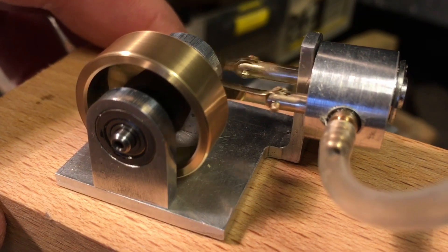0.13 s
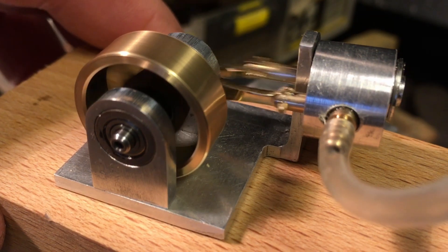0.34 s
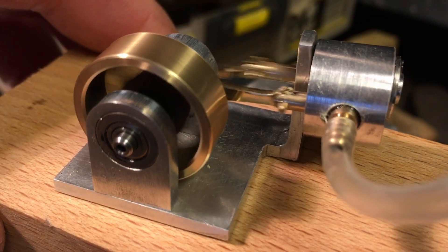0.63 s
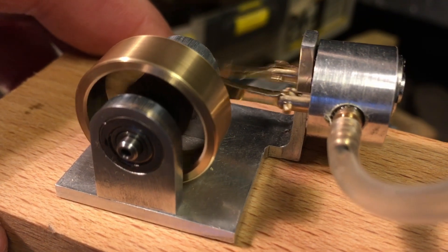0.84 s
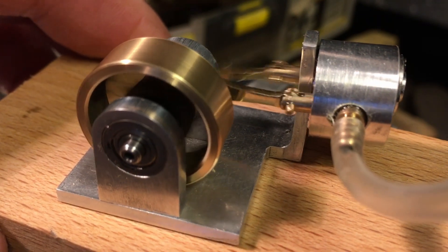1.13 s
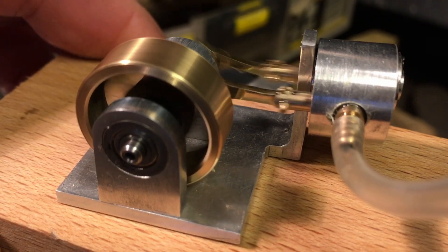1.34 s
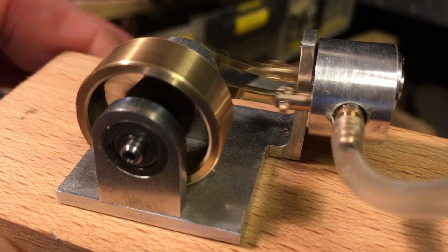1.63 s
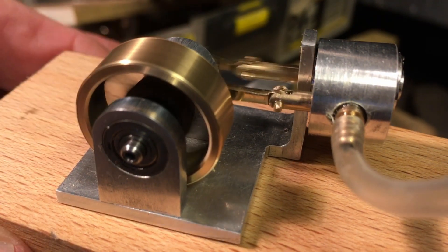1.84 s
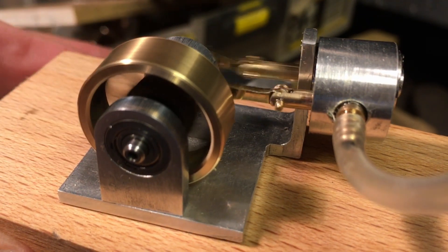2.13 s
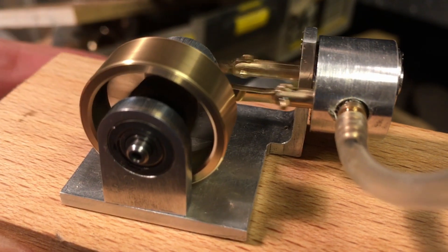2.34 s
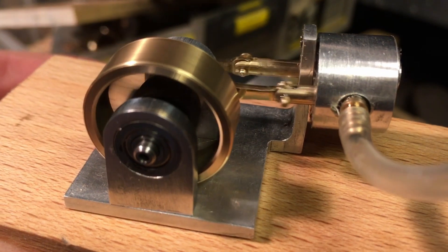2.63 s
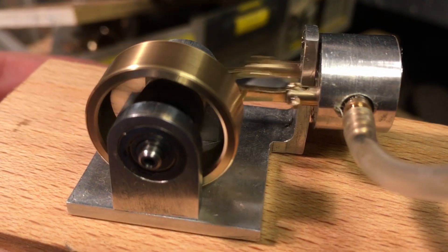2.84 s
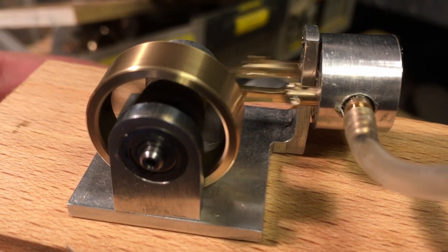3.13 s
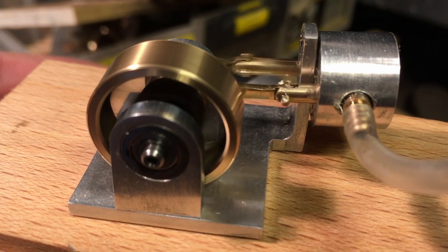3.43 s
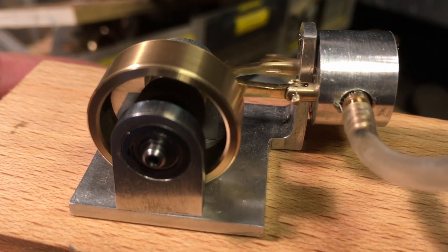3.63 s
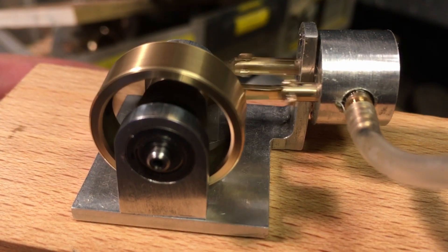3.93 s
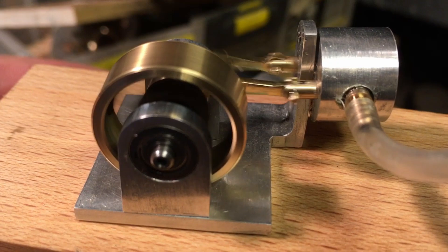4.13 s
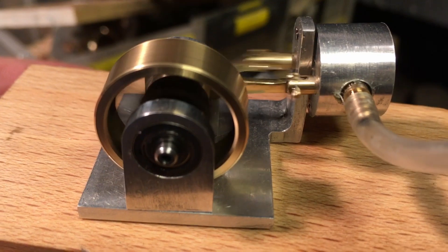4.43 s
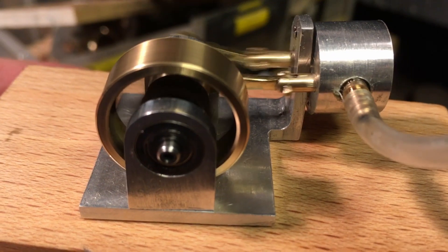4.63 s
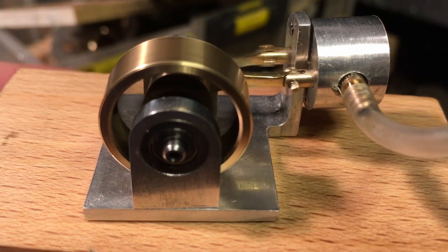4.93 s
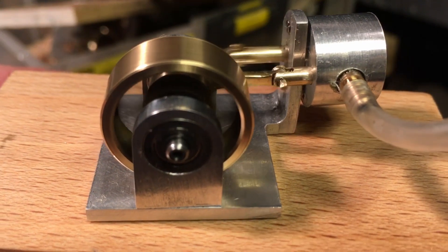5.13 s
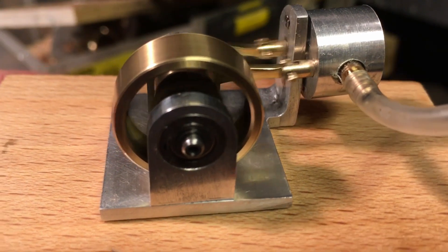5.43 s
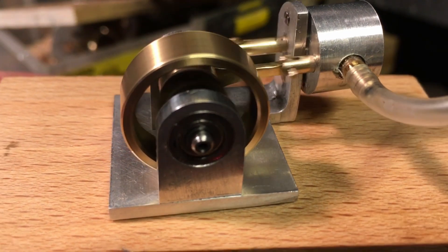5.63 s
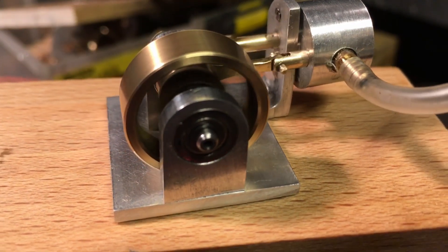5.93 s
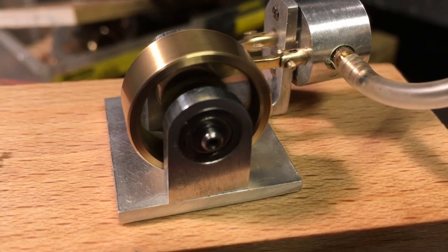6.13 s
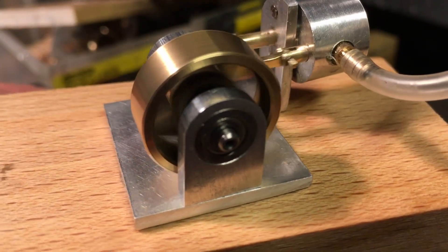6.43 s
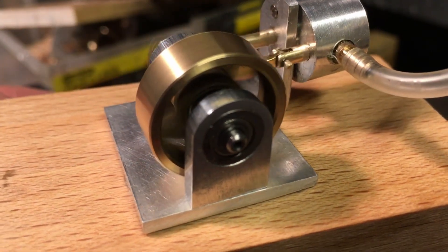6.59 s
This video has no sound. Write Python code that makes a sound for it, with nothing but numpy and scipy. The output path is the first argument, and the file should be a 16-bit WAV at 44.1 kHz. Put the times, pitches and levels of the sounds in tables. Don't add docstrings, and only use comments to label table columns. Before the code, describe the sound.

A miniature air-powered engine on a wooden board runs without pause, about seven and a half turns a second. Each turn gives a sharp metallic tick, lighter clicks and two short hissing puffs, about fifteen puffs a second, with faint airy whistles. Near the end it slows slightly and the ticking brightens. A very faint low hum lies beneath. Close microphone, dry small workshop, slightly stronger on the right.

```python
import sys
import numpy as np
from scipy import signal
from scipy.fft import rfft, irfft
from scipy.io import wavfile

SR = 44100
rng = np.random.default_rng(int(sys.argv[2]) if len(sys.argv) > 2 else 0)


def int16_out(signal):
    q = np.round(np.clip(np.atleast_2d(signal).T, -1, 1) * 32767)
    wavfile.write(sys.argv[1], SR, q.astype(np.int16))


def makeup_ratio(level_db):
    decades = np.asarray(level_db, float) / 20
    return 10 ** decades


N = 298116

# time in seconds, turns done; a turn begins with the rod knock.
CRANK = [(-.0132, 0), (.253, 2), (.5209, 4), (.7854, 6), (1.3109, 10), (1.5765, 12), (1.9744, 15),
         (2.3686, 18), (2.5007, 19), (2.8938, 22), (3.8104, 29), (4.5944, 35), (4.9838, 38), (5.5061, 42),
         (5.6389, 43), (5.7744, 44), (6.3186, 48), (6.857, 52)]

# place in the turn (0-1), flow in dB, sharpness of the jet in dB.
PORTS = [(.03, 3, .3), (.12, -2.5, 2.2), (.165, .8, 1.3), (.195, 5, -5.5), (.215, -2.5, -4),
         (.24, -10, 2.5), (.32, -25, 2.7), (.405, -31, 2.5), (.425, -11.1, .3), (.445, -2.5, -1.3),
         (.48, .4, .1), (.63, -.3, 0), (.695, -6.6, -2.1), (.725, -20, 5.5), (.865, -32, -1), (.9, -11, -6),
         (.945, .7, -5), (.975, 4.8, -5.2)]
# level at full flow in dB, share of the flow swing, share of the sharpness.
AIR_LAYERS = [
    (-60, 0.62, -1),
    (-55, 1.02, -0.15),
    (-53, 0.78, -0.068),
    (-48, 1.3, 0.62),
]
# frequency in Hz, density in dB per Hz.
GUSH_COLOUR = [(1300, -20.5), (2100, -9.5), (2900, -3), (3500, 0.5), (4100, -2), (4700, -3.5)]
RUSH_COLOUR = [(3800, -21.5), (4400, -4), (4950, -3), (5500, 1.5), (6300, 0.5), (7000, -1), (7700, -7),
               (8300, -28)]
JET_COLOUR = [(7300, -15), (8000, -6.5), (8700, -1), (9800, -5), (10500, -3.5), (11300, -11.5),
              (12000, 1.5), (12800, -24)]
LEAK_COLOUR = [(11200, -30), (12000, -11), (13000, -2), (14500, 0), (15700, 1), (16000, -29), (16500, -40)]
SPILL_COLOUR = [(350, 0), (700, -22.5), (1100, 3.5), (1600, 3.5), (2300, 4)]
SPILL_DB, SPILL_LAG_TURN = -14.5, 0.045
# time in seconds, level in dB.
SUPPLY = [(0, 0.5), (1.7, 1), (2.6, -0.1), (5.4, -0.5), (5.9, -1), (6.6, -0.7), (6.76, -1.5)]
DULL_CEILING_DB, DULL_FOLLOWS, WHISTLE_FOLLOWS = -0.17, 2.7, 1.9
# time in seconds, dB the second puff's bright air gains and the first loses.
SWING = [(5.3, 0.063), (6.3, 1.5)]
JET_FACING_DB = 1.55
# time in seconds, level in dB.
LEAK_FACING = [(0.5, 0), (3.5, 0.7), (6.6, -0.7)]
# place in the turn (0-1), pitch in Hz, level in dB.
WHISTLES = [
    [(.01, 1300, -85), (.07, 2500, -69), (.12, 2950, -67), (.17, 2750, -70), (.2, 2300, -85)],
    [(.45, 2200, -80), (.5, 3200, -67), (.53, 3700, -63), (.58, 4200, -66), (.63, 4200, -67),
     (.66, 3900, -85)],
    [(.49, 2400, -85), (.56, 2750, -73), (.605, 2880, -61.5), (.64, 2680, -60), (.675, 2200, -70),
     (.7, 1900, -85)],
]
LOW_WHISTLE_DB, LOW_WHISTLE_SCATTER_DB, CHOKED_DB, HIGH_WHISTLE_SCATTER_DB = 4.5, 1.6, -11, 1.5
CHOKED_TURNS = [0, 1, 7, 9, 12, 18, 22, 25, 28, 32, 33, 34, 35, 39, 41, 44, 46, 47, 49, 50]

# frequency in Hz, density in dB per Hz.
ROOM_COLOUR = [(20, -6), (40, 3.5), (64, 10.5), (100, 5.5), (200, 1.5), (500, -4.5), (1190, -2),
               (1790, -6.5), (2760, 0), (4870, -17.5), (7510, -11.5), (8360, -6.5), (14800, -12),
               (16000, -22)]
ROOM_DB, MOTOR_HZ, MOTOR_DB = -68.5, 54, -71.5
# time in seconds, pitch in Hz, level in dB, length in seconds.
FAR_HUMS = [(0.44, 155, -74, .12), (0.523, 196.7, -74.5, 0.17), (1.36, 750, -72, 0.095),
            (1.447, 196, -77, 0.18), (2.544, 136, -71, 0.13), (4.228, 220, -75, 0.15),
            (5.054, 196.4, -73, 0.18), (5.37, 197, -69, 0.14), (5.6, 187, -73, 0.15),
            (6.084, 198, -71, 0.1)]

# pitch in Hz, t60 in seconds, then level in dB under rod, valve and return knocks.
LINKS = [(8340, 0.006, -15, -7, -10.5), (9620, 0.003, -2, -1.5, -4.5), (11090, 0.0017, 0.5, 1, -0.5),
         (12420, 0.0041, -8, -0.5, -3.5), (13240, 0.0012, -17.5, 5, 0), (15300, 0.0041, -24, -9, -19),
         (14600, .0016, -17, -23, -37)]
# pitch in Hz, t60 in seconds, level in dB.
BOARD = [(570, 0.0062, -15.5), (1187, 0.0083, -3.5), (1965, 0.0079, -4.5), (2590, 0.0058, 1.5),
         (3380, 0.0036, 1.5), (6000, 0.0029, -3), (1229, 0.047, -16), (1652, 0.029, -23)]
BOARD_DB = -2
# pitch in Hz, t60 in seconds, level in dB.
THUMP = [(612, 0.016, -6), (873, 0.035, -10.5), (1155, 0.013, -3.5)]
THUMP_DB = -38
RISE_S = .00045

TOUCH_TURN = [.195, .452, .805, .85, .942]
# ring in dB, thud in dB.
TOUCH_DB = [(-52, -52), (-39, -54), (-46, -60), (-57, -63), (-35, -66)]
TOUCH_SCATTER_TURN = .003
# time in seconds, level in dB.
TOUCH_FADE = [(5.3, -1.5), (6.2, -8)]

# time in seconds, then rod, valve and return knock in dB.
PLAY = [(0, -21, -33, -27), (.6, -19.5, -29.5, -27), (1.05, -20, -29.5, -28), (1.3, -22, -30.5, -27.5),
        (1.9, -22, -31, -27), (2.3, -20.3, -30, -26.5), (2.65, -20.5, -32, -26.5), (3.1, -18.5, -32, -25.5),
        (3.65, -21, -32.5, -22.5), (4.0, -18.3, -31.3, -24), (4.42, -16.5, -31.5, -24.5),
        (4.75, -20.8, -30.5, -23.5), (5.1, -20, -32.5, -26.5), (5.4, -18, -32.5, -23.5),
        (5.55, -19, -26.5, -26), (5.95, -18.5, -32, -24.3), (6.25, -18, -36.5, -23), (6.7, -22, -36, -28)]
KNOCK_SCATTER_DB, KNOCK_SCATTER_TURN = .5, .0015
# delay in ms, level in dB.
CHATTER = [(.55, -12), (1.0, -19), (4.4, -32), (7.2, -35)]
# time in seconds, place in the turn (0-1).
VALVE_TURN = [(5.38, .268), (5.5, .226), (5.95, .228), (6.18, .261), (6.46, .268), (6.58, .236)]
VALVE_THUD_DB = -48.5
RETURN_TURN, RETURN_THUD_DB, THUD_SCATTER_DB = .7075, -45, 1.1
# delay in ms, its scatter in ms, level in dB, its scatter in dB.
VALVE_REBOUND, RETURN_REBOUND = (2.4, .75, -41, 3), (1.6, .2, -31.5, 2.5)
# time in seconds, dB per higher mode.
RETURN_DULLER = [(5.3, 0), (6.3, -1.2)]
# time in seconds, extra level in dB.
ODD_RETURN = [(.08, 2), (.61, 1.5), (.75, 6), (1.4, 5.5), (1.67, 7.5), (1.8, 2), (1.94, 3.5), (2.07, -3.5),
              (2.46, 4), (2.99, -1), (3.38, 0.5), (3.51, 0.5), (4.16, 0.5), (4.56, 2.2), (4.69, -0.3),
              (5.47, 0), (6.14, 0), (6.28, -2.5)]
ROD_THUD_DB = -36.5
# time in seconds, dB per higher mode.
ROD_BRIGHTER = [(5.3, 1.15), (6.2, 5)]
# time in seconds, extra level in dB.
ODD_ROD = [(.25, -3), (.39, 1), (.79, -1.5), (1.05, 2), (1.18, -1.5), (2.63, -1.5), (2.76, 1.5),
           (3.02, 1.5), (3.16, -2.3), (3.29, 1.5), (4.72, -1.5), (5.64, -1.5), (6.18, 2.3), (6.32, -1.2),
           (6.45, 1.2), (6.59, -1.7)]


def follow(curve, s):
    return np.interp(s, *np.transpose(curve))


def rms_one(x):
    return x / np.sqrt(np.mean(x ** 2) + 1e-20)


def noise(spectrum):
    hz, db = np.transpose(spectrum)
    bins = np.arange(N // 2 + 1) * SR / N + 1e-3
    gain = makeup_ratio(np.interp(np.log(bins), np.log(hz), db, left=-90, right=-90))
    return rms_one(irfft(rfft(rng.standard_normal(N)) * gain, N))


def drift(rate_hz):
    r = np.exp(-2 * np.pi * rate_hz / SR)
    return rms_one(signal.lfilter([1], [1, -2 * r, r * r], rng.standard_normal(N + SR))[SR:])


def narrow(hz, width_hz, steady=0):
    phase = 2 * np.pi * np.cumsum(hz * np.ones(N)) / SR
    return rms_one((steady + drift(width_hz)) * np.cos(phase) + drift(width_hz) * np.sin(phase))


def ring(clicks, hz, t60):
    r, w = makeup_ratio(-60 / (t60 * SR)), 2 * np.pi * hz / SR
    return signal.lfilter([0, np.sin(w)], [1, -2 * r * np.cos(w), r * r], clicks + 1e-18)


def strike(times, levels_db, modes, spread_db, tilt_db=0):
    at = np.round((times - RISE_S) * SR).astype(int)
    inside = (at >= 0) & (at < N)
    luck = rng.standard_normal((len(at), len(modes)))
    out = np.zeros(N)
    for k, (hz, t60, mode_db) in enumerate(modes):
        height = makeup_ratio(levels_db + mode_db + tilt_db * k + spread_db * luck[:, k])
        clicks = np.zeros(N)
        np.add.at(clicks, at[inside], height[inside])
        out += (-1) ** k * ring(clicks, hz, t60)
    return out


def crank():
    s, done = np.transpose(CRANK)
    ends = np.interp(np.arange(done[-1] + 1), done, s)
    return ends[:-1], np.diff(ends), np.interp(np.arange(N) / SR, s, done)


def exhaust(turns):
    t = np.arange(N) / SR
    at, *columns = np.transpose(PORTS)
    flow_db, sharp_db = [np.interp(turns % 1, at, c, period=1) for c in columns]
    gush_db, rush_db, jet_db, leak_db = [
        db + follows * flow_db + sharpens * sharp_db for db, follows, sharpens in AIR_LAYERS]
    supply_db = follow(SUPPLY, t)
    dull_db = DULL_FOLLOWS * np.minimum(supply_db, DULL_CEILING_DB) + 0.27 * drift(3.3)
    second = -np.cos(2 * np.pi * (turns - .07))
    bright_db = supply_db + follow(SWING, t) * second
    eddies_db = np.minimum(1.0 * drift(250) + .7 * drift(900) ** 2 - .7, 6)
    spill_db = np.interp(turns - SPILL_LAG_TURN, turns, gush_db) + SPILL_DB
    jet_db = jet_db + JET_FACING_DB * second + bright_db
    leak_db = leak_db + follow(LEAK_FACING, t) + bright_db
    out = makeup_ratio(rush_db + dull_db + eddies_db + 0.44 * drift(40)) * noise(RUSH_COLOUR)
    out += makeup_ratio(gush_db + dull_db + eddies_db + 1.6 * drift(60)) * noise(GUSH_COLOUR)
    out += makeup_ratio(spill_db + 2.6 * drift(50)) * noise(SPILL_COLOUR)
    out += makeup_ratio(jet_db + eddies_db + 2.2 * drift(120)) * noise(JET_COLOUR)
    out += makeup_ratio(leak_db + eddies_db + 1.0 * drift(120)) * noise(LEAK_COLOUR)
    return out


def port_whistles(turns):
    turn = turns.astype(int)
    luck = rng.standard_normal((turn.max() + 1, 2))[turn]
    choke_db = CHOKED_DB * np.isin(turn, CHOKED_TURNS)
    low_db = LOW_WHISTLE_DB + LOW_WHISTLE_SCATTER_DB * luck[:, 0] + choke_db
    supply_db = follow(SUPPLY, np.arange(N) / SR)
    high_db = WHISTLE_FOLLOWS * supply_db + HIGH_WHISTLE_SCATTER_DB * luck[:, 1]
    out = np.zeros(N)
    for rows, strength_db in zip(WHISTLES, (low_db - 1.5, high_db, low_db)):
        at, hz, db = np.transpose(rows)
        pitch = np.interp(turns % 1, at, hz) * (1 + .012 * drift(6))
        level_db = np.interp(turns % 1, at, db, left=-120, right=-120) + strength_db
        out += makeup_ratio(level_db) * narrow(pitch, width_hz=120, steady=4)
    return out


def workshop():
    t = np.arange(N) / SR
    hum = np.sqrt(2) * np.sin(2 * np.pi * np.cumsum(MOTOR_HZ + 0.755 * drift(3.6)) / SR)
    out = makeup_ratio(MOTOR_DB) * (hum * makeup_ratio(1.2 * drift(4)) + .4 * narrow(MOTOR_HZ + 1.5, width_hz=7))
    out += makeup_ratio(-89.5) * narrow(198, width_hz=5.7)
    for s, hz, db, length in FAR_HUMS:
        swell = np.exp(-(2 * (t - s) / length) ** 2)
        out += makeup_ratio(db) * swell * np.sin(2 * np.pi * hz * t)
    return out + makeup_ratio(ROOM_DB) * noise(ROOM_COLOUR)


def touches(start, length):
    luck = rng.standard_normal((len(start), len(TOUCH_TURN), 3))
    times = start[:, None] + (TOUCH_TURN + TOUCH_SCATTER_TURN * luck[..., 0]) * length[:, None]
    ring_db, thud_db = np.transpose(TOUCH_DB)
    ring_db = ring_db + follow(TOUCH_FADE, times) + 2.2 * luck[..., 1]
    thud_db = thud_db + 2.0 * luck[..., 2]
    links = strike(times.ravel(), ring_db.ravel(), [m[:3] for m in LINKS], spread_db=2.5)
    board = strike(times.ravel(), thud_db.ravel(), BOARD, spread_db=1.8)
    return np.array([links, board])


def force_db(times, play_db, odd):
    db = np.interp(times, np.transpose(PLAY)[0], play_db)
    db = db + KNOCK_SCATTER_DB * rng.standard_normal(len(times))
    for s, extra_db in odd:
        db[np.abs(times - s).argmin()] += extra_db
    return db


def bounce(rule, times, db):
    ms, scatter_ms, level_db, scatter_db = rule
    luck = rng.standard_normal((len(db), 2))
    level_db = level_db + follow(TOUCH_FADE, times) + 1.5 + scatter_db * luck[:, 1]
    return np.clip(ms + scatter_ms * luck[:, 0], 1, 3.5), np.minimum(level_db - db, -1)


def knock(times, db, rebound_ms, rebound_db, thud_db, link_column, tilt):
    luck = rng.standard_normal((len(times), len(CHATTER), 2))
    hits = np.concatenate([times, times + rebound_ms / 1000])
    blows, blows_db = [hits], [db, db + rebound_db]
    for j, (ms, less_db) in enumerate(CHATTER):
        blows.append(times + ms / 1000 * (1 + 0.078 * luck[:, j, 0]))
        blows_db.append(db + less_db + 0.77 * luck[:, j, 1])
    blows, blows_db = np.concatenate(blows), np.concatenate(blows_db)
    tilt_db = follow(tilt, blows)
    modes = [(m[0], m[1], m[link_column]) for m in LINKS]
    links = strike(blows, blows_db - 3 * tilt_db, modes, spread_db=1.0, tilt_db=tilt_db)
    thuds_db = BOARD_DB + np.concatenate([thud_db, thud_db + rebound_db - 4])
    return np.array([links, strike(hits, thuds_db, BOARD, spread_db=1.6)])


def valve_knocks(start, length):
    scatter = KNOCK_SCATTER_TURN * rng.standard_normal(len(start))
    times = start + (follow(VALVE_TURN, start) + scatter) * length
    db = force_db(times, np.transpose(PLAY)[2] - 2.5, [])
    rebound_ms, rebound_db = bounce(VALVE_REBOUND, times, db)
    thud_db = VALVE_THUD_DB + 0 * start
    return knock(times, db, rebound_ms, rebound_db, thud_db, link_column=3, tilt=[(0, 0)])


def return_knocks(start, length):
    luck = rng.standard_normal((len(start), 2))
    times = start + (RETURN_TURN + KNOCK_SCATTER_TURN * luck[:, 0]) * length
    db = force_db(times, np.transpose(PLAY)[3], ODD_RETURN)
    rebound_ms, rebound_db = bounce(RETURN_REBOUND, times, db)
    thud_db = RETURN_THUD_DB + THUD_SCATTER_DB * luck[:, 1]
    return knock(times, db, rebound_ms, rebound_db, thud_db, link_column=4, tilt=RETURN_DULLER)


def rod_knocks(start):
    db = force_db(start, np.transpose(PLAY)[1] + 1.0, ODD_ROD)
    rebound_ms, rebound_db = 1.0 + 0 * start, -22 + 0 * start
    links, board = knock(start, db, rebound_ms, rebound_db, db + ROD_THUD_DB, link_column=2, tilt=ROD_BRIGHTER)
    return np.array([links, board + strike(start, db + THUMP_DB, THUMP, spread_db=1.2)])


def small_parts(x):
    links, board = x
    links = signal.sosfilt(signal.butter(6, 7800, "high", fs=SR, output="sos"), links)
    return links + signal.sosfilt(signal.butter(2, 450, "high", fs=SR, output="sos"), board)


def bench(x, t60=.06, wet_db=-26):
    t = np.arange(round(.12 * SR)) / SR
    tail = rng.standard_normal(len(t)) * makeup_ratio(-60 * t / t60) * (t > .0015)
    tail = tail / np.sqrt(np.sum(tail ** 2))
    return x + makeup_ratio(wet_db) * signal.fftconvolve(x, tail)[:N]


def scene():
    start, length, turns = crank()
    air = exhaust(turns) + port_whistles(turns)
    contacts = touches(start, length) + valve_knocks(start, length)
    contacts = contacts + return_knocks(start, length) + rod_knocks(start)
    engine = air + small_parts(contacts)
    return (bench(engine) + workshop()) * makeup_ratio(np.array([[-1.68], [1.37]]))


def low_pass(x):
    return signal.sosfilt(signal.butter(12, 17000, fs=SR, output="sos"), x)


def record(dry):
    mix = signal.sosfilt(signal.cheby2(10, 50, 16700, fs=SR, output="sos"), dry)
    return low_pass(mix)


dry = scene()
out = record(dry)
int16_out(out)
```